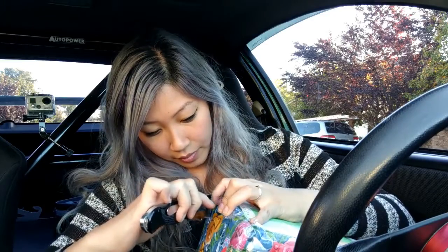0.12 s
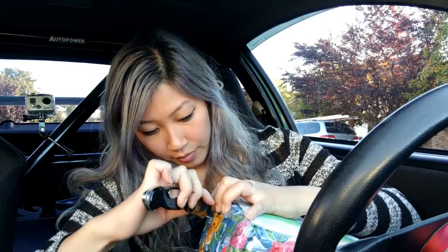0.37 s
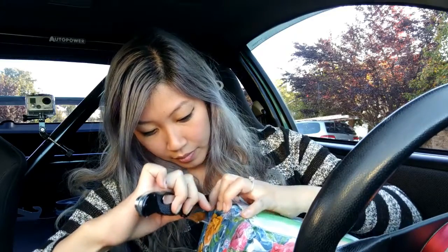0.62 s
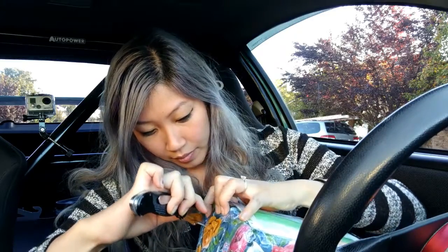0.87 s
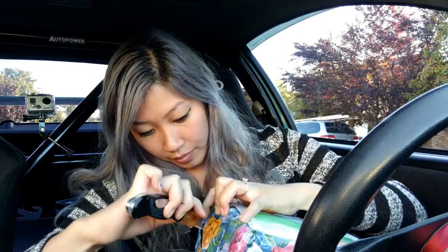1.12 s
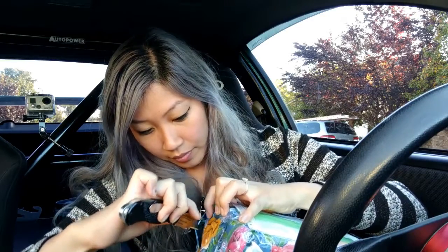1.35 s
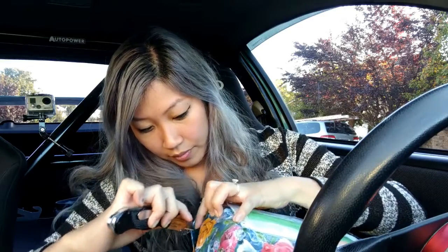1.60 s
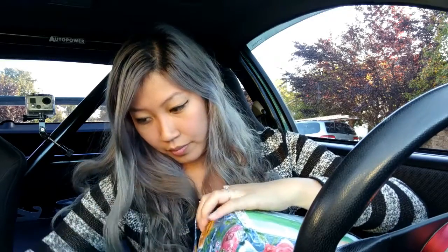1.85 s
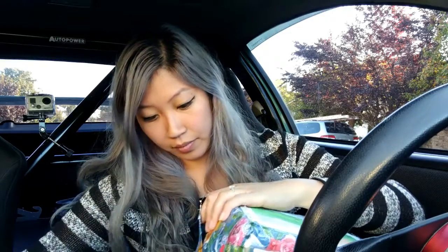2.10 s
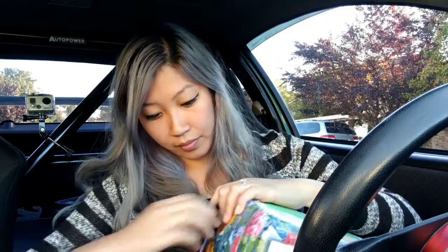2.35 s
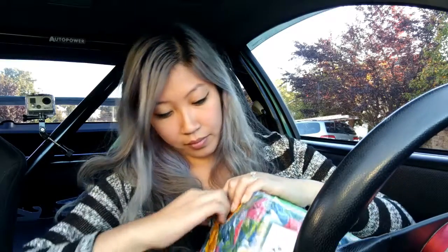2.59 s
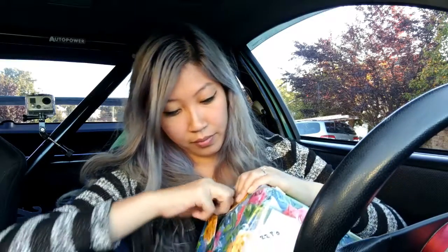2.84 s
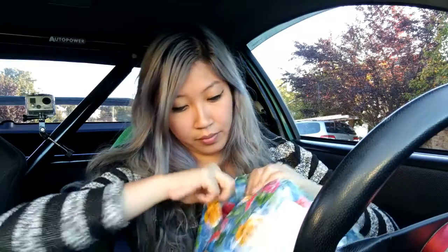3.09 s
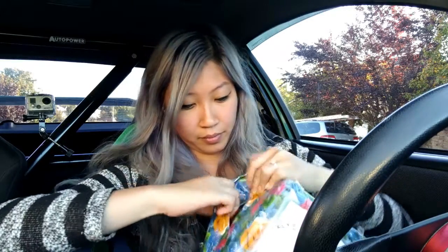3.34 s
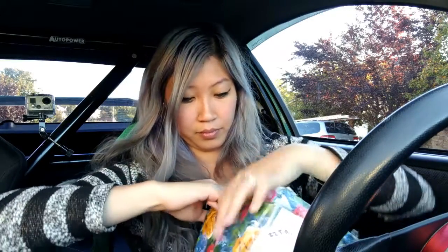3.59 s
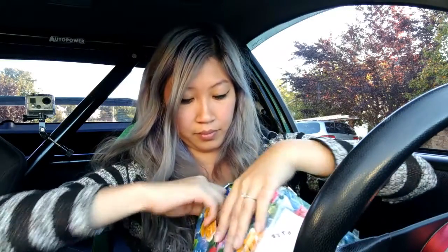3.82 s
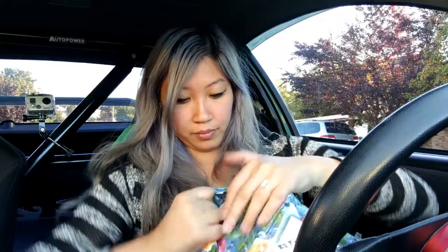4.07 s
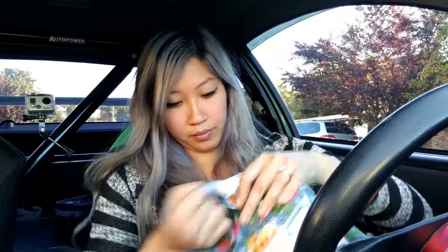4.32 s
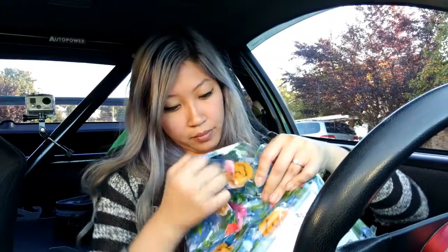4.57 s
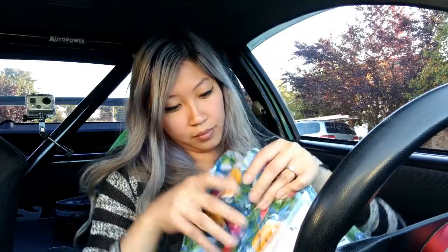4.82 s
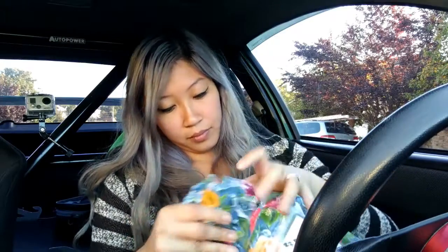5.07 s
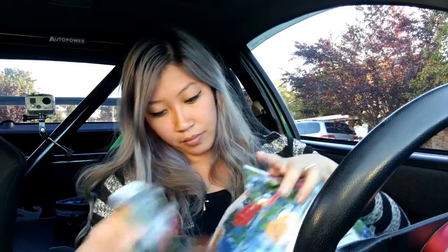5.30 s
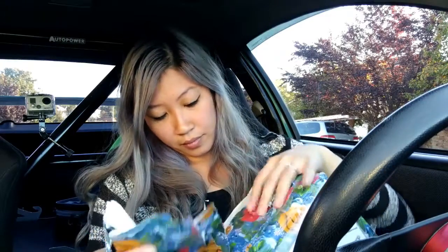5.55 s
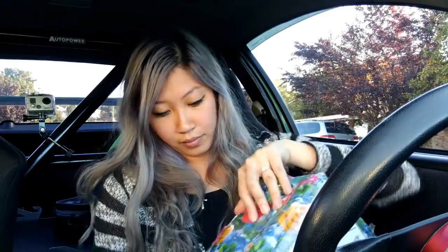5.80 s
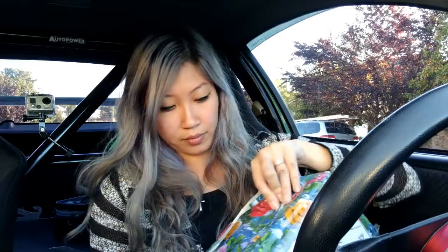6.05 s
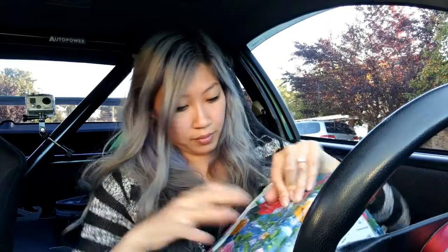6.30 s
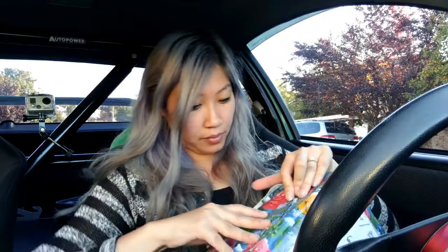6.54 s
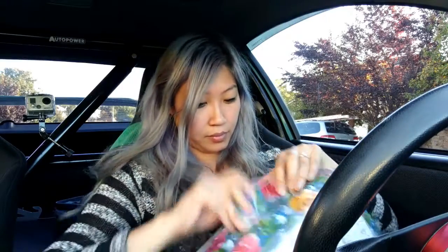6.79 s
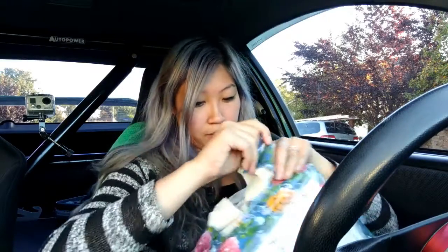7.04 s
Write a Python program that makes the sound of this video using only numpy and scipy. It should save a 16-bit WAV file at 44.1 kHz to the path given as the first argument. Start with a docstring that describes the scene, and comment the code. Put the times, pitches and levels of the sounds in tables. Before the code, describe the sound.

Crisp packaging crackles and rips under busy fingers in a small padded car cabin, with soft low thumps from parcel and seat.

```python
"""A paper and plastic wrapper is picked at, crumpled and torn by hands inside a parked car.
Creases snap one by one (short noise runs ringing a patch of sheet) over a bed of small noise-grain crackles.
Parcel and seat thump softly as resonances of the cabin air; the small hard cabin adds a short noise tail.
Behind lie a faint filtered-noise hush and a low cabin mode, a wavering sine that swells with shifts of weight."""
import sys
import numpy as np
from scipy import signal
from scipy.fft import rfft, irfft, next_fast_len
from scipy.io import wavfile
from scipy.ndimage import map_coordinates

SR = 44100
rng = np.random.default_rng(int(sys.argv[2]) if len(sys.argv) > 2 else 0)


def volts_from_db(level):
    """Convert decibel levels to linear amplitude ratios."""
    exponent = np.asarray(level, float) / 20
    return 10 ** exponent


def inscribe(sig):
    """Save sig as 16-bit PCM at rate SR to the path in sys.argv[1].

    A 1-D sig is mono; a 2-D sig holds one channel per row.
    Samples are clipped to [-1, 1] before scaling.
    """
    pcm = np.round(np.clip(np.atleast_2d(sig).T, -1, 1) * 32767)
    wavfile.write(sys.argv[1], SR, pcm.astype(np.int16))


N = 315756

# spectrum of the wrapper as heard in the cabin: freq_hz, level_db (per Hz)
WRAPPER_SPECTRUM = [(530, -29), (900, -28), (1060, -3), (1370, -16.5), (1880, 0.5), (2650, -7),
                    (3380, -3.5), (4030, -9), (5480, -5.5), (8240, -15.5), (10400, -17.5), (11600, -27),
                    (12500, -65), (16300, -78), (22000, -120)]
# spectrum of slack sheet and parcel as heard in the cabin: freq_hz, level_db (per Hz)
SLACK_SPECTRUM = [(59, -37.5), (100, -30), (146, -1), (246, -10), (370, -2.5), (484, -17.5), (563, -8),
                  (668, -5), (883, -13), (1060, -11.5), (1300, -12), (1690, -11.5), (2860, -120)]


def unit(x):
    """Scale to rms 1."""
    return x / np.sqrt(np.mean(x ** 2) + 1e-20)


def along(points, hz):
    """(Hz, value) points read on a log frequency axis."""
    point_hz, value = np.transpose(points)
    return np.interp(np.log(hz + 1), np.log(point_hz + 1), value)


def wobble(knots_per_s):
    """Smooth random curve through normal random knots."""
    knots = rng.standard_normal(int(N * knots_per_s / SR) + 4)
    return map_coordinates(knots, [np.arange(N) * knots_per_s / SR])


def filtered(x, response):
    """x times a complex response of frequency."""
    size = next_fast_len(x.shape[-1] + 8192)
    hz = np.fft.rfftfreq(size, 1 / SR)
    return irfft(rfft(x, size) * response(hz), size)[..., :x.shape[-1]]


def coloured(x, spectrum):
    """x through a (Hz, dB) spectrum."""
    return filtered(x, lambda hz: volts_from_db(along(spectrum, hz)))


def resonance(hz, centre_hz, width_hz):
    """One causal resonance, gain 1 at its centre."""
    return 1j * hz * width_hz / (centre_hz ** 2 - hz ** 2 + 1j * hz * width_hz)


def swells(start_s, hold_s, gain_db, rise_db_per_s, fall_db_per_s):
    """Events climb in dB, hold and sink; the returned function sums their weighted gains by power."""
    t = np.arange(0, N, 64) / SR
    climb_db = rise_db_per_s * np.clip(start_s - t, 0, 9)
    sink_db = fall_db_per_s * np.clip(t - start_s - hold_s, 0, 9)
    rows = volts_from_db(gain_db - climb_db - sink_db)

    def total(weight):
        return np.interp(np.arange(N) / SR, t, np.sqrt(np.sum((weight * rows) ** 2, axis=0)))
    return total


def snaps():
    """Each crease gives way in a short stuttering run that rings its own patch of sheet and shakes the parcel."""
    # snapping creases: start_s, crack_db, run_s, ring_hz, brightness_db (treble over body)
    creases = [(0.0794,-52,0.01117,6174,-5.5),(.1937,-46.5,0.01402,4552,-10.5),(0.3034,-54,0.01913,4950,-5),(0.4225,-52.5,0.004844,2326,-21.5),
               (0.4623,-45.5,0.0297,6420,4.5),(.5862,-52,0.03319,4231,-0.5),(.635,-54,0.0385,3728,-12.5),(0.8236,-46,0.00358,1978,-3),
               (.8539,-50.5,0.01727,2023,-8),(.899,-39,0.00262,2106,2.5),(0.933,-43.5,0.01487,2073,2),(.9834,-52,0.00488,6440,9.5),(1.1283,-45,0.01055,2067,-2.5),
               (1.1523,-45.5,0.02139,3426,-3.5),(1.1891,-44,0.005186,3910,-6.5),(1.2466,-40,0.003134,5254,11.5),(1.3327,-40.5,0.00536,3764,-0.5),
               (1.401,-53.5,0.0032,2110,-13),(1.4496,-36.5,0.005592,4842,-3),(1.638,-45.5,0.00413,1986,-2),(1.6656,-41.5,0.003434,4654,-0.5),
               (1.7371,-49,0.001862,2073,-19),(1.772,-51.5,0.001926,3298,-17),(1.8132,-48,0.03215,3599,-12.5),(1.8625,-45,0.005356,2139,-7),
               (1.885,-46.5,0.003995,2095,-8),(1.9965,-42.5,0.009453,3654,-6.5),(2.06,-48,0.0126,2924,-12.5),(2.0839,-34,0.005045,4943,-12),
               (2.102,-44.5,0.0207,4455,15.5),(2.1269,-39,0.00416,6000,7.5),(2.1465,-38.5,0.00364,2048,-0.5),(2.2007,-39.5,0.003987,4034,1.5),
               (2.233,-41.5,0.01447,5340,8.5),(2.2987,-47.5,0.008405,5310,17.5),(2.3972,-41.5,0.00157,3420,-7.5),(2.4318,-43.5,0.00313,4408,9),
               (2.494,-38,0.00882,4673,-1),(2.5406,-36.5,0.01442,4475,-9.5),(2.561,-34,0.004512,1995,-4),(2.5975,-34.5,0.00627,7230,19),
               (2.633,-43.5,0.01763,4674,-10.5),(2.693,-43.5,0.00938,2360,-18.5),(2.7028,-29,0.002773,3628,3),(2.7963,-35,0.01926,4377,7),(2.8843,-35,0.006954,3664,7.5),
               (2.926,-44,0.03572,3244,-4),(2.967,-44,0.02154,4480,-5.5),(3.0432,-34,0.0178,2226,-19.5),(3.0673,-16.5,0.006287,3538,-6),
               (3.098,-30.5,0.001624,3427,-13),(3.1264,-33.5,0.01914,2997,-5),(3.1807,-31,0.015606,5787,-1),(3.2163,-31,0.011937,3524,5.5),
               (3.271,-40.5,0.01838,3485,3),(3.3065,-37.5,0.02251,3180,-11.5),(3.3937,-40,0.00489,4345,-1.5),(3.4148,-38,0.015103,3555,-12),
               (3.4535,-41,0.03516,4454,3.5),(3.5215,-45,0.02578,2121,-26.5),(3.5763,-45,0.02318,3373,-10.5),(3.643,-44.5,0.00197,3380,-11.5),
               (3.6852,-37.5,0.02502,1713,-4),(3.771,-45,0.00983,2071,-13.5),(3.792,-39.5,0.0121,2267,-5),(3.8222,-31.5,0.005117,5348,3.5),(3.847,-36,0.01876,3231,-8.5),
               (3.9106,-24,0.003491,1950,-6.5),(4.02,-23,0.001615,3808,4.5),(4.075,-28,0.010624,3159,3),(4.0936,-35,0.004155,1960,8),(4.138,-27.5,0.004542,3492,-1.5),
               (4.2213,-28,0.005476,2105,5.5),(4.2638,-38,0.00233,1960,-1.5),(4.2965,-33.5,0.002977,2052,-5),(4.3376,-17,0.006534,2054,-12.5),(4.4262,-30,0.004204,3397,-11.5),
               (4.4724,-26,0.00522,3593,-1),(4.5197,-38,0.03287,3359,-10.5),(4.596,-28.5,0.006927,7626,8.5),(4.653,-32.5,0.00592,3234,-10.5),
               (4.68,-42.5,0.02914,3123,-29),(4.7273,-41,0.0412,3377,-7),(4.7599,-34,0.002983,2017,-2),(4.8155,-26.5,0.0096,2291,5),
               (4.8488,-29,0.01833,3227,-7),(4.863,-22,0.002375,3272,8),(4.8955,-26,0.00156,3576,-3.5),(4.9358,-33,0.003256,5454,-4.5),
               (4.981,-19,0.002035,3493,-10.5),(5.0251,-25,0.003976,1990,3),(5.052,-25.5,0.005688,5332,-1),(5.072,-27.5,0.002904,3640,-8.5),
               (5.0943,-31.5,0.004426,3370,2),(5.1157,-25.5,0.00168,4662,12),(5.1303,-30,0.01458,4670,-11),(5.1454,-25,0.02604,1904,6.5),(5.1926,-24.5,0.01038,4681,4),(5.3304,-26,0.042275,3021,8.5),
               (5.489,-47,0.03202,2113,-14.5),(5.5393,-41,0.0367,1925,-7),(5.5601,-32.5,0.002708,7797,16.5),(5.6302,-39.5,0.0091,3203,-9),
               (5.6525,-24,0.004135,2044,9.5),(5.6878,-26,0.01413,2023,8.5),(5.7545,-42,0.02345,5324,0.5),(5.813,-30.5,0.003865,5230,19.5),(5.8429,-29.5,0.03638,4148,8.5),
               (5.8995,-25.5,0.003474,6290,7),(5.9605,-40,0.06384,1838,-10),(6.028,-31.5,0.015606,7045,-3.5),(6.0904,-33,0.006966,1787,-3.5),
               (6.1887,-48,0.00421,4923,-9),(6.3194,-44.5,0.01345,2649,-6.5),(6.368,-41.5,0.016684,2409,-5),(6.4096,-37.5,0.00834,4397,-1.5),
               (6.4373,-43.5,0.001957,6520,16.5),(6.516,-38,0.01983,5322,11.5),(6.5687,-42,0.0359,5613,-12.5),(6.6814,-30.5,0.005845,4494,11.5),
               (6.717,-27,0.004607,3418,7),(6.7435,-22,0.008378,4498,6.5),(6.8119,-28.5,0.0396,3251,6.5),(6.901,-33.5,0.03913,3356,11),
               (7.0193,-37,0.00704,4010,-1),(7.047,-41,0.0107,4790,12),(7.077,-38,0.03392,3647,-7.5),(7.1296,-34.5,0.00517,3463,-7.5)]
    start_s, crack_db, run_s, ring_hz, bright_db = np.transpose(creases)[:, :, None]
    treble_share = 0.56532  # the body takes the rest of the brightness
    treble_db = -10.5 + treble_share * bright_db
    body_db = -9.5 - (1 - treble_share) * bright_db
    run_s = np.clip(run_s, .001, .06)
    t = np.arange(4096) / SR

    shape = volts_from_db(-60 * np.clip(t - run_s, 0, 1) / 0.022157)  # t60 in s, after the run
    shape = shape * volts_from_db(-5.5 * np.minimum(t / run_s, 1))
    shape = shape * (1 - np.exp(-t / 0.0003703))
    shape = shape * (1 + 0.3535 * np.exp(-t / 0.000662))  # stronger first give
    slips = np.repeat(rng.standard_normal((len(start_s), 32)), 128, axis=1)
    shape = shape * volts_from_db(3.661 * slips * (t > .003))  # uneven slips after the first give
    noise = rng.standard_normal((len(start_s), 3, len(t)))

    def dull(hz):
        return 1 / (1 + (hz / 6500) ** 8)

    def low_tilt(hz):
        # body under -9 dB thins the ring below 3 kHz, body over it lifts it
        return volts_from_db(0.343 * (body_db + 9.0) * np.log2(3000 / np.clip(hz, 1000, 3000)))

    def patch(hz):
        ring = .45 + resonance(hz, ring_hz, .4 * ring_hz)
        return volts_from_db(along(WRAPPER_SPECTRUM, hz)) * dull(hz) * low_tilt(hz) * ring

    def levelled(x):
        return x / np.sqrt(np.sum(x ** 2, axis=1, keepdims=True) / SR / (run_s + 0.001898))

    crack = filtered(noise[:, 0] * shape, patch)
    fizz = filtered(noise[:, 1] * shape, lambda hz: volts_from_db(along(WRAPPER_SPECTRUM, hz)) * (1 - dull(hz)))
    body = coloured(noise[:, 2] * shape ** 0.7037, SLACK_SPECTRUM)
    rows = levelled(crack) + volts_from_db(treble_db) * levelled(fizz) + volts_from_db(body_db) * levelled(body)
    rows = volts_from_db(crack_db) * rows
    where = np.round(start_s * SR).astype(int) + np.arange(len(t))
    return np.bincount(where.ravel(), rows.ravel(), N + len(t))[:N]


def grain_bursts(starts, sizes, t60_s, length):
    """Noise bursts that start at once and die away, summed at their starts."""
    t = np.arange(length)
    decay = volts_from_db(-60 * t / SR / t60_s[:, None])
    rows = sizes[:, None] * decay * rng.standard_normal((len(starts), length))
    return np.bincount((starts[:, None] + t).ravel(), rows.ravel(), N + length)[:N]


def crackle(grains_per_s, spread_db, base_t60_s, clump_db):
    """Many small creases at random moments, a few far larger than the rest, arriving in clumps."""
    draw = rng.random((round(grains_per_s * N / SR), 3))
    starts = (draw[:, 0] * N).astype(int)
    sizes = volts_from_db(-spread_db * np.log(draw[:, 1] + 0.003044))
    t60_s = base_t60_s * (0.997 + draw[:, 2])
    return grain_bursts(starts, sizes, t60_s, length=512) * volts_from_db(clump_db * wobble(35))


def rustle():
    """The handled sheet crackles brightly, each patch in its own colour; where slack it flaps in a lower tone."""
    # pulls and tears at the sheet: start_s, hold_s, crackle_db, slack_db (low flapping over the crackle)
    tears = [(0.193, 0.03774, -62.5, 1.5), (0.477, 0.02492, -57.5, -9), (0.859, 0.0892, -54.5, -10),
             (1.129, 0.04756, -57, -7), (2.12, 0.09873, -55.5, 0.5), (2.537, 0.01622, -41, -7),
             (2.8, 0.01857, -41, -1), (2.931, 0.0382, -46.5, 0.5), (3.405, 0.0827, -50, 3),
             (3.07, 0.01584, -33, -3), (3.691, 0.02963, -47, -2), (4.046, 0.04983, -40, -4),
             (4.33, 0.06193, -24, -6), (4.569, 0.02883, -42.5, 3), (4.83, 0.04169, -36.5, 0.5),
             (4.945, 0.0483, -33, -8), (5.188, 0.06107, -28.5, -4.5), (5.284, 0.06741, -27, -8.5),
             (5.69, 0.01326, -28, -10), (5.831, 0.05077, -28.5, -12.5), (5.99, 0.04268, -34.5, -9.5),
             (6.795, 0.107, -27, -8), (6.926, 0.05527, -31, -8.5)]
    # how busy the fingers are between pulls: time_s, crackle_db
    finger_activity = [(0, -70.5), (1.42, -70), (1.66, -62), (2.46, -58), (3.2, -47), (3.62, -55),
                       (4.2, -41), (4.64, -51), (5.1, -38), (5.42, -53.5), (5.78, -45), (6.1, -48),
                       (6.27, -55), (6.49, -62.5), (6.53, -41), (6.72, -33.5), (7.02, -49), (7.16, -45)]
    start_s, hold_s, crackle_db, slack_db = np.transpose(tears)[:, :, None]
    pulls = swells(start_s, hold_s, crackle_db, rise_db_per_s=227.5, fall_db_per_s=332.5)
    time_s, finger_db = np.transpose(finger_activity)
    fingers = volts_from_db(np.interp(np.arange(N) / SR, time_s, finger_db))

    def patch(centre_hz):
        grains = crackle(260, spread_db=2.5, base_t60_s=0.016403, clump_db=2.5)
        return filtered(grains, lambda hz: .4 + resonance(hz, centre_hz, centre_hz / 2))

    patches_hz = (2037, 3084.7, 5013, 9362)
    bright = sum(volts_from_db(2.0286 * wobble(7)) * patch(hz) for hz in patches_hz)  # patches take turns
    bright = volts_from_db(1.0124 * wobble(45)) * bright  # jerks
    low = crackle(500, spread_db=1.8742, base_t60_s=0.026857, clump_db=1.57)
    taut_gain = np.hypot(fingers, pulls(0.9902))
    slack_gain = np.hypot(fingers * volts_from_db(-3), pulls(volts_from_db(slack_db)))
    taut = taut_gain * unit(coloured(bright, WRAPPER_SPECTRUM))
    return taut + slack_gain * unit(coloured(low, SLACK_SPECTRUM))


def thumps():
    """A softened push on parcel or seat wakes the cabin's air modes, most of all the one nearest its own tone."""
    # soft knocks: start_s, peak_db, tone_hz
    knocks = [(0.468, -43.5, 318.2), (2.2, -25.5, 154.1), (2.404, -39, 140), (3.067, -25, 350),
              (3.588, -35, 156.7), (4.07, -30.5, 331), (4.34, -21, 380.4), (5.562, -35.5, 150.9),
              (5.687, -29, 380), (5.849, -31, 145), (6.657, -26.5, 310), (6.717, -19, 160.6),
              (6.743, -22, 147.8)]
    # cabin air modes: centre_hz, width_hz, relative_level_db (before the weighting by tone)
    air_modes = [(147.88, 19.997, -6), (188.28, 15.967, -7), (324.27, 55.31, -8), (706.86, 83.2, -12)]
    out, push = np.zeros(N + SR), np.zeros(SR // 4)
    push[0] = 1
    for start_s, peak_db, tone_hz in knocks:
        def response(hz):
            total = 0
            for k, (centre_hz, width_hz, mode_db) in enumerate(air_modes):
                near_db = -9.5 * abs(np.log2(centre_hz / tone_hz))
                total = total + (-1) ** k * volts_from_db(mode_db + near_db) * resonance(hz, centre_hz, width_hz)
            return total / (1 + 1j * hz / 600) ** 2  # two lowpass poles soften the push
        knock = filtered(push, response)
        out[round(start_s * SR):][:len(push)] += volts_from_db(peak_db) * knock / knock.max()
    return out[:N]


def cabin(x):
    """Glass and trim answer with a dense short noise tail, redrawn every 1/8 s as for a new hand position."""
    # cabin decay: freq_hz, t60_s
    decay_times = [(200, 0.1426), (2500, 0.09688), (11000, 0.10044)]
    wet, step = np.zeros(N + SR), SR // 8
    for start in range(0, N, step):
        hz, t, z = signal.stft(rng.standard_normal(SR // 4), SR, nperseg=128)
        decay = volts_from_db(-60 * t / along(decay_times, hz)[:, None])
        tail = signal.istft(z * decay, SR, nperseg=128)[1]
        answer = signal.fftconvolve(x[start:start + step], tail / np.linalg.norm(tail))
        wet[start + 90:][:len(answer)] += answer  # delay of 90 samples
    return wet[:N]


def background():
    """Faint steady hush, and the lowest cabin mode booming at a wavering pitch with loose trim shaking along."""
    # spectrum of the quiet cabin: freq_hz, level_db (per Hz)
    hush_spectrum = [(18, -30.5), (30, 22), (71, 18.5), (244, 4), (347, 1.5), (482, -33), (704, -9.5),
                     (1360, -99), (1930, -21), (2550, -26.5), (4800, -31.5), (10200, -25), (12500, -49),
                     (16300, -84), (22000, -120)]
    # shifts of weight that set the cabin booming: peak_s, gain_db, span_s (to swell or sink by 20 dB)
    weight_shifts = [(.472, -49, 0.2346), (1.02, -49.5, 0.0068), (1.424, -49, 0.1691),
                     (2.118, -34.5, 0.0754), (2.213, -20.5, 0.0371), (2.3, -33.5, 0.1136),
                     (2.432, -35.5, 0.1256), (2.57, -49.5, 0.3356), (2.83, -50.5, 0.2016),
                     (3.075, -37, 0.0719), (3.22, -47, 0.0751), (3.66, -49, 0.3141), (4.09, -49.5, 0.2805),
                     (4.37, -38.5, 0.0305), (4.62, -50, 0.0863), (4.88, -52.5, 0.13), (5.17, -41, 0.034),
                     (5.3, -53.5, 0.2958), (5.65, -44.5, 0.1458), (5.87, -43, 0.1288), (6.05, -47, 0.143),
                     (6.423, -49.5, 0.046), (6.62, -52, 0.0632), (6.746, -32, 0.0921), (6.82, -44, 0.0451),
                     (6.92, -41, 0.0276), (7.16, -48, 0.22)]
    hush = volts_from_db(-55.5) * unit(coloured(rng.standard_normal(N), hush_spectrum))
    pitch_hz = 62 + 7.5 * wobble(9.5)
    mode = unit(np.sin(2 * np.pi * np.cumsum(pitch_hz) / SR))
    shake = unit(filtered(rng.standard_normal(N), lambda hz: resonance(hz, 81.63, 98.82) ** 2))
    waver = volts_from_db(1.5 * wobble(12))
    peak_s, gain_db, span_s = np.transpose(weight_shifts)[:, :, None]
    sway = swells(peak_s, 0, gain_db, 20 / span_s, 20 / span_s)(1)
    boom = np.hypot(volts_from_db(-62), sway)  # resting level, dB
    return hush + boom * (waver * mode + 0.3327 * shake)


def scene():
    """Wrapper in the cabin, knocks and background."""
    wrapper = snaps() + rustle()
    mix = wrapper + volts_from_db(-8.5) * cabin(wrapper) + thumps() + background()
    return mix[None]


def band_limit(x):
    """A steep low-pass at the top of the band."""
    return signal.sosfilt(signal.butter(12, 12680, fs=SR, output="sos"), x)


def record(dry):
    """The microphone drops the deepest bass: two second-order resonant highpass stages near 34 Hz."""
    mix = filtered(dry, lambda hz: (resonance(hz, 33.822, 59.294) * 1j * hz / 60) ** 2)
    return band_limit(mix)


dry = scene()
out = record(dry)
inscribe(out)
```